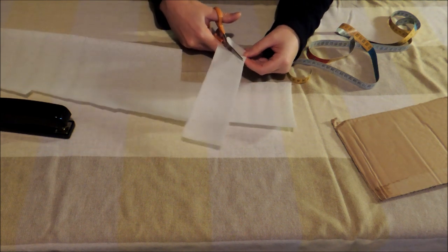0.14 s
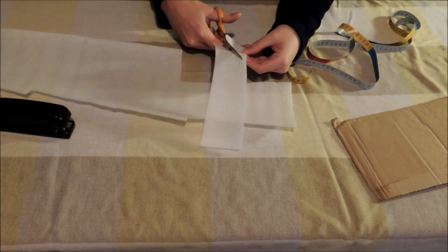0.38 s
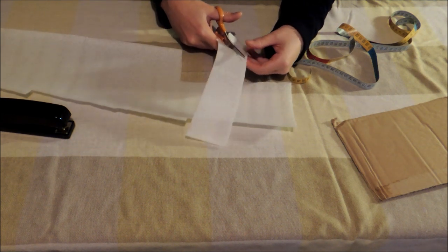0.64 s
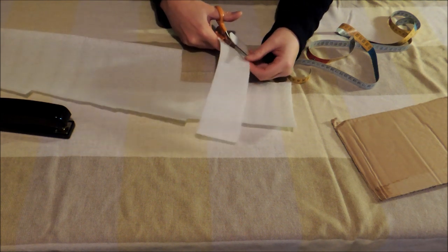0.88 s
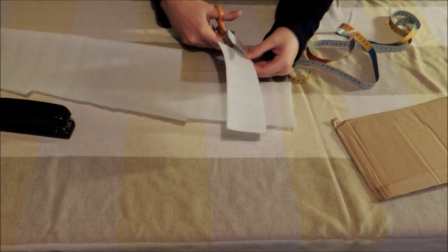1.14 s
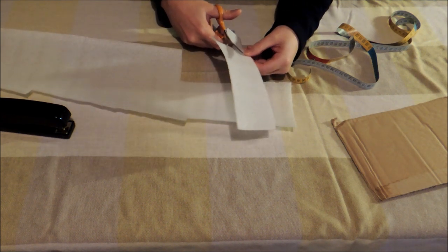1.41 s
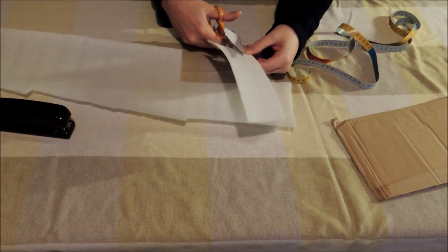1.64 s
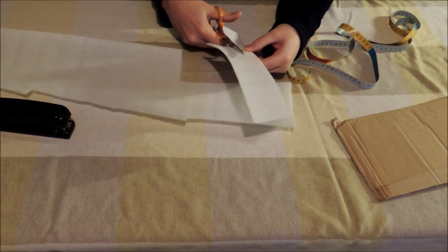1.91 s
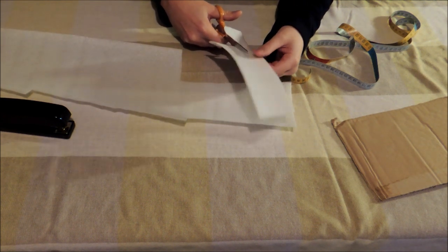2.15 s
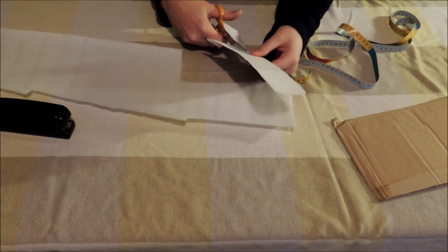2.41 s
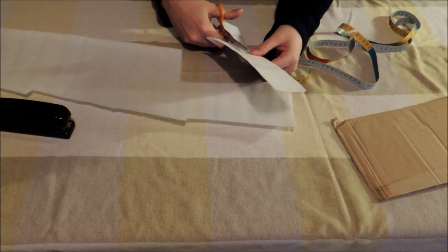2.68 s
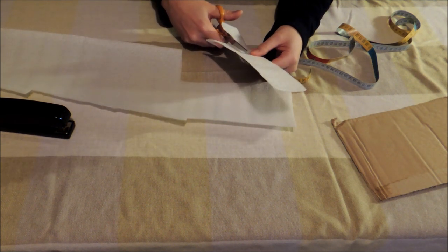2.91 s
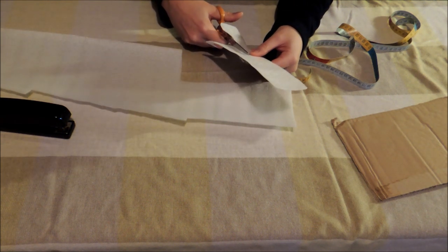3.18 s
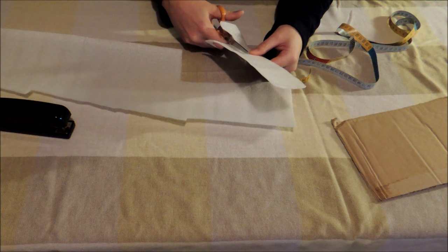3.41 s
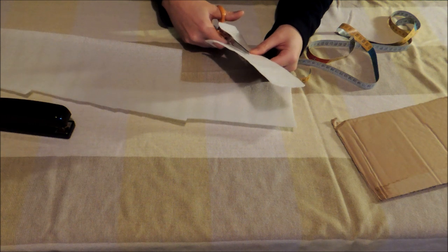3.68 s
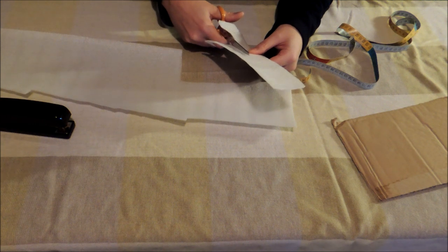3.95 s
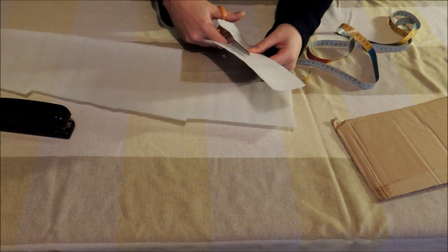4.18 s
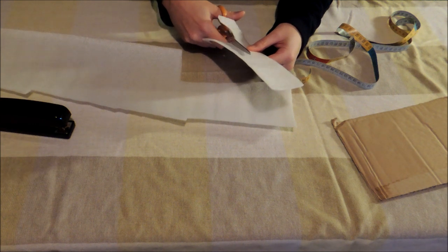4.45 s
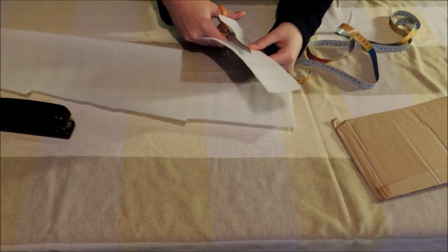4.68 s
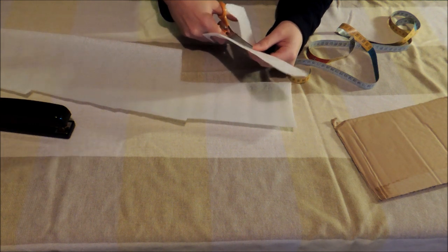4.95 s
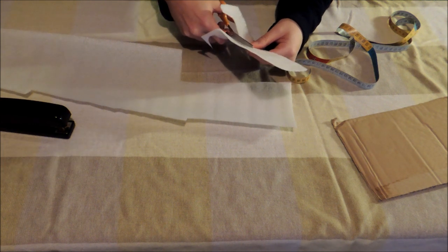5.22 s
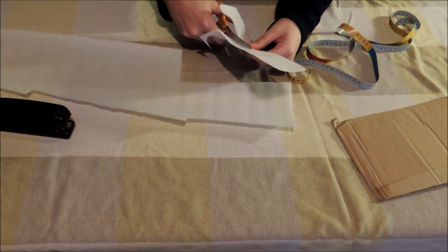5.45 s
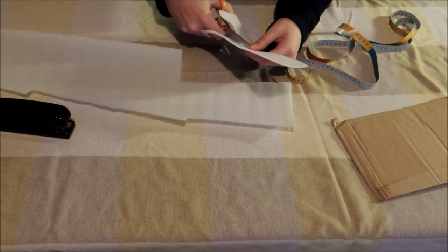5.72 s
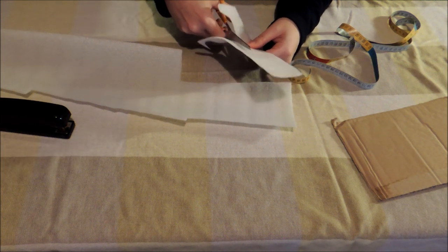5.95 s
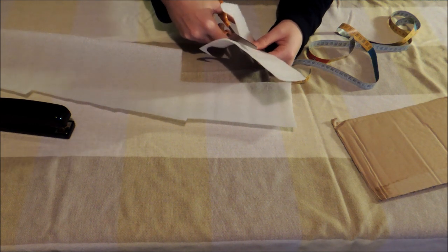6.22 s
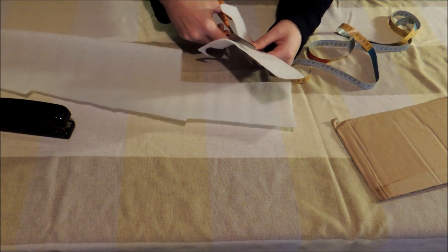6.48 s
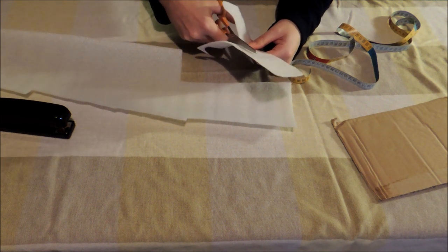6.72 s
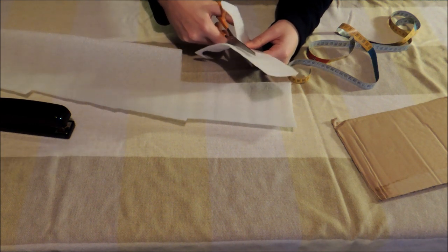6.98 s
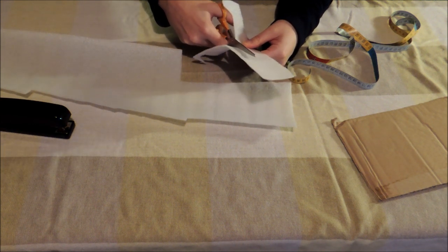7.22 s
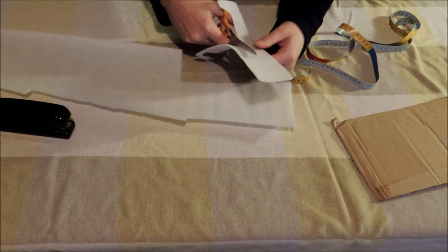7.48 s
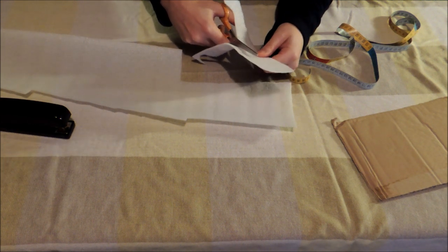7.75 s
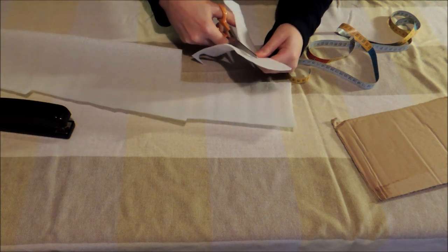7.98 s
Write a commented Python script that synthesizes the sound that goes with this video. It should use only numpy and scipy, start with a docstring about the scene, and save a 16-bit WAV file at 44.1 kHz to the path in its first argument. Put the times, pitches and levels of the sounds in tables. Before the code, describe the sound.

Sparse, sharp little cuts in a foam sheet, dry and fizzy with soft dull knocks, in a quiet room with faint hiss and far traffic.

```python
"""Scissors nibble along a thin foam sheet over a cloth-covered table, close under a camera.
Each stroke is friction noise: dense random slips, weighted by blade pressure, ring the colours of the foam.
Torn cells add sub-millisecond bursts, and the flexing sheet knocks dully; early echoes and a short
diffuse tail answer from table and walls. Behind lie filtered noises: quiet room rumble, slowly
swelling far traffic, a heavy vehicle and the hiss of two microphones."""
import sys
import numpy as np
from scipy import signal
from scipy.fft import rfft, irfft
from scipy.io import wavfile
from scipy.ndimage import uniform_filter1d, minimum_filter1d

SR = 44100
rng = np.random.default_rng(int(sys.argv[2]) if len(sys.argv) > 2 else 0)


def wav_record(signal):
    """Record a signal, one row per channel, as 16-bit PCM in the file named by sys.argv[1]."""
    frames = np.transpose(np.atleast_2d(signal))
    bounded = np.clip(frames, -1, 1)
    # unit amplitude maps onto the largest positive 16-bit level
    quanta = np.round(bounded * 32767).astype(np.int16)
    wavfile.write(sys.argv[1], SR, quanta)


def level_to_linear(level):
    """Convert decibel levels to linear amplitude factors, elementwise."""
    exponent = np.asarray(level, float) / 20
    return 10 ** exponent


N = 358091

# spectra of tearing foam, from the finest cells to the coarsest: (frequency [Hz], relative level [dB])
FIZZ = [(7000, -40.5), (10500, -6), (12300, -0.5), (14000, -4), (15000, -26.5), (16500, -20.5)]
CRISP = [(5000, -24.5), (7500, -2), (9300, -1), (11000, -2), (14000, -15)]
CRUNCH = [(2000, -15.5), (3000, -8.5), (3600, -7.5), (4900, -4), (7000, -1.5), (10000, -19)]
# the blades bite, pressure coming quickly and letting go slowly:
# (time of full pressure [s], fizz level [dB], crunch over fizz [dB], length [s])
BITES = [(0.075, -61, -2, .041), (0.445, -67, -5.5, .069), (0.766, -65, 11, 0.02), (1.252, -63, -1, .037),
         (1.347, -52.5, -2, .043), (1.707, -55.5, 1, 0.031), (1.768, -59, -1, .029), (1.998, -60, -4, .056),
         (2.04, -59, -1, 0.038), (2.605, -49.5, -2.5, 0.046), (3.044, -63, -10, .057),
         (3.334, -59, -3, 0.044), (3.538, -60.5, -3, 0.057), (3.674, -53, -4, 0.049), (4.015, -56, 1, 0.05),
         (4.341, -54, -3.5, 0.04), (4.653, -49, -2, 0.048), (4.905, -58, -5, .027), (4.93, -48, -1.5, .035),
         (5.27, -68, -1, 0.064), (5.539, -55, -3, 0.036), (5.75, -59.5, -3, 0.078), (6.461, -67, -2, 0.034),
         (6.868, -43, -0.5, 0.062), (7.45, -53, -1, 0.038), (7.605, -60, -7, 0.026),
         (8.06, -51, -2.5, .023), (8.089, -43.5, 0.5, .035)]


def evened(x):
    """Normalisation of signal power: scales to rms 1."""
    return x / np.sqrt(np.mean(x ** 2) + 1e-20)


def read(points, hz):
    """Linear interpolation of a spectrum on a logarithmic frequency axis."""
    f, value = np.transpose(points)
    return np.interp(np.log(hz + 1), np.log(f + 1), value)


def wash(spectrum, patchy_db, apart=1.):
    """Spectral shaping of Gaussian noise with drifting patches; coherence between microphones is high in the bass."""
    # likeness of left and right: (frequency [Hz], correlation [-1 to 1])
    likeness = [(60, 0.97), (150, 0.91), (380, 0.66), (950, 0.39), (2380, -0.019), (5980, -0.051),
                (15000, 0.069)]
    frames, hz = N // 512 + 5, np.fft.rfftfreq(2048, 1 / SR)
    a, b, c, d, patches = rng.standard_normal((frames, 1025, 5)).T
    patches = uniform_filter1d(patches, size=20, axis=0)  # across frequency
    patches = evened(uniform_filter1d(patches, size=10, axis=1))  # across time
    same = np.clip(1 - apart * (1 - read(likeness, hz)), -1, 1)[:, None]
    left = a + 1j * b
    right = same * left + np.sqrt(1 - same ** 2) * (c + 1j * d)
    z = np.array([left, right]) * level_to_linear(read(spectrum, hz)[:, None] + patchy_db * patches)
    return evened(signal.istft(z, nperseg=2048, noverlap=1536)[1][:, :N])


def room_tone():
    """Stationary coloured noise: the room's rumble and the microphones' hiss."""
    # (frequency [Hz], relative density [dB per Hz])
    tone = [(12, -36), (20, 0), (48, -5.5), (99, -8), (232, -12.5), (430, -16.5), (700, -19.5),
            (1250, -17.5), (1600, -18.5), (2200, -24.5), (2700, -22.5), (3000, -25), (4100, -27),
            (6660, -27.5), (9300, -29), (13400, -28.5), (16500, -25.5)]
    return level_to_linear(-50.5) * wash(tone, patchy_db=0.8)


def far_traffic():
    """Amplitude-modulated noise: distant traffic swells slowly."""
    # (frequency [Hz], relative density [dB per Hz])
    roar = [(60, -24), (150, -6), (300, -7), (550, -6.5), (750, -5), (1000, -1.5), (1400, -2), (1900, -6),
            (2500, -12.5), (6000, -28)]
    # (time [s], level [dB])
    swell = [(0, -72), (2.2, -69.5), (4.3, -58.5), (5.7, -55.5), (8.2, -55.5)]
    return level_to_linear(np.interp(np.arange(N) / SR, *np.transpose(swell))) * wash(roar, patchy_db=1.5, apart=0.65)


def vehicle_rumble():
    """Amplitude-modulated low-frequency noise: a heavy vehicle's rumble comes and goes."""
    # (frequency [Hz], relative density [dB per Hz])
    low_roar = [(15, -24), (30, 5), (70, -9), (130, -17.5), (400, -40)]
    # (time [s], level [dB])
    swell = [(0, -59), (1, -60), (2, -77), (6, -72), (6.8, -59), (7.4, -55.5), (8.2, -74)]
    return level_to_linear(np.interp(np.arange(N) / SR, *np.transpose(swell))) * wash(low_roar, patchy_db=4.0)


def background():
    """Superposition of the ambient noises, a little stronger on the left."""
    return (room_tone() + far_traffic() + vehicle_rumble()) * level_to_linear([[1.3], [.8]])  # left, right [dB]


def scatter(count, rise, fall, size=18):
    """Spectral whitening: short random bursts keep only fine ripple, on an even broad colour."""
    n = np.arange(512)
    z = rfft(rng.standard_normal((count, 512)) * (n + 1.) ** rise * np.exp(-n / fall))
    z /= np.sqrt(uniform_filter1d(abs(z) ** 2, size=size, axis=1))
    return np.roll(irfft(z), 64, axis=1)  # 64 samples of lead-in


def room(x):
    """Reverberation: smeared early echoes from table, wall and ceiling, then a diffuse, decaying tail."""
    # near surfaces: (delay [s], left level [dB], right level [dB])
    echoes = [(.0017, -13.5, -7.5), (.0035, -13, -25), (.0078, -24, -20), (.0083, -23, -8.5),
              (0.011, -43, -26), (0.0163, -23, -40), (.0204, -38, -23)]
    # (frequency [Hz], reverberation time for 60 dB of decay [s])
    decay_times = [(1000, 0.37), (4000, 0.3), (8000, 0.22), (13000, 0.14)]
    tail_db = -7.5  # diffuse tail
    length, wet = SR // 2, 0
    for turn in range(3):
        hz, t, z = signal.stft(rng.standard_normal((2, length)), SR, nperseg=128)
        z = z * level_to_linear(-60 * t / read(decay_times, hz)[:, None])
        tail = signal.istft(z, SR, nperseg=128)[1][:, :length]
        tail *= np.clip(np.arange(length) / SR / 0.018, .2, 1)  # reflections thicken over the first moments
        tail *= level_to_linear(tail_db) / np.linalg.norm(tail[0])
        smears = scatter(count=len(echoes), rise=0, fall=6.1)  # rough surfaces
        for (delay, left_db, right_db), smear in zip(echoes, smears):
            tail[:, round(delay * SR) - 64:][:, :512] += np.outer(level_to_linear([left_db, right_db]), smear)
        # three random responses take turns at constant total power, so no single tail colours every snap
        share = np.sqrt(2 / 3) * np.cos(np.pi * (np.arange(N) / SR * 3 + turn / 3))
        wet = wet + signal.fftconvolve(x * share, tail, axes=1)[:, :N]
    return x + wet


def leaned(x):
    """Frequency-dependent level difference: the hands sit where the left microphone catches more treble."""
    # (frequency [Hz], left minus right [dB])
    lean = [(1000, 0.5), (5000, -0.5), (9000, 0), (13000, 3.5)]
    lean_db = read(lean, np.fft.rfftfreq(N, 1 / SR))
    return irfft(rfft(x) * level_to_linear(lean_db * np.array([[.5], [-.5]])), N)


def causal(gain):
    """Minimum phase by the folded cepstrum: shortest causal response with the given spectra (last axis)."""
    cepstrum = irfft(np.log(gain + 1e-5 * gain.max(-1, keepdims=True)))
    half = cepstrum.shape[-1] // 2
    cepstrum[..., 1:half] *= 2
    cepstrum[..., half + 1:] = 0
    return irfft(np.exp(rfft(cepstrum)))


def peaked(gain):
    """Peak normalisation: scales spectra so that their minimum-phase clicks peak at 1."""
    return gain / abs(causal(gain)).max(-1, keepdims=True)


def flexing(centre_hz):
    """Damped resonance: the colour of the sheet flexing once."""
    hz = np.fft.rfftfreq(512, 1 / SR)
    return peaked(1 / (1 + ((hz - centre_hz) / 720.0) ** 2) ** 2)


def burst(times, spectra):
    """Impulsive excitation of a filter: brief jolts of each spectrum, partly unlike in the two microphones."""
    unlike = 0.33  # gain of the part that has opposite sign in the two microphones
    both, apart = scatter(count=2 * len(times), rise=.5, fall=11., size=32).reshape(-1, 2, 512).transpose(1, 0, 2)
    jolts = both + unlike * np.array([apart, -apart])
    jolts = jolts * level_to_linear(3.5)  # spread over time, so lifted to keep the peak
    sounds = signal.fftconvolve(causal(spectra)[None], jolts, axes=2)
    loudest = uniform_filter1d(sounds.sum(0) ** 2, size=14, axis=1).argmax(1)
    starts = np.round(times * SR).astype(int) - loudest
    out = np.zeros((2, N + 1024))
    for k, start in enumerate(starts):
        out[:, start:start + sounds.shape[2]] += sounds[:, k]
    return out[:, :N]


def knocks():
    """Impulse response of a bending plate: the sheet bucks with a dull knock."""
    # (time [s], level [dB], centre frequency [Hz])
    bucks = [(0.7574, -44.5, 2200), (1.699, -40, 1760), (1.7625, -37, 1900), (2.0055, -41, 1720),
             (4.6537, -47, 1110), (4.9294, -40.5, 1500), (4.9359, -41, 1110), (7.183, -42, 2620),
             (7.199, -42, 2720), (7.446, -37, 2870), (7.6312, -33, 1050), (8.0803, -38.5, 1050)]
    s, db, hz = np.transpose(bucks)[:, :, None]
    return burst(s[:, 0], level_to_linear(db) * flexing(hz))


def all_strokes():
    """Asymmetric pressure pulses: bites and slides as rows of time, level, crunch, rise and fall."""
    # blades or a finger slide along the foam, pressure building, then dropping:
    # (time of full pressure [s], fizz level [dB], crunch over fizz [dB], length [s])
    slides = [(0.263, -67, -4, .041), (0.834, -51.5, -12, .047), (1.037, -58, 0, .046),
              (1.892, -61.5, -1, .052), (2.161, -48.5, -7, 0.032), (2.29, -54.5, -11, 0.072),
              (2.354, -60, -7, .023), (2.435, -55.5, -3.5, 0.076), (2.786, -60.5, -3, .051),
              (3.226, -61.5, -6, 0.054), (3.872, -59.5, -1.5, .052), (4.201, -53.5, -3.5, 0.053),
              (4.535, -52.5, -3, 0.054), (5.381, -60, -3.5, 0.12), (5.905, -57, -3, .085),
              (6.078, -41, -7, 0.048), (6.353, -65, -1, .058), (6.69, -57, -0.5, .07),
              (7.054, -50, -1.5, 0.077), (7.196, -48, 2.5, 0.054), (7.363, -49.5, -1.5, 0.067),
              (7.632, -51.5, -0.5, 0.095), (7.813, -62.5, 1, .031), (7.912, -57.5, -4, 0.13)]
    bite_rise, slide_rise = 0.33, .57  # share of the length spent rising
    rows = [(s, db, crunch_db, share * length, (1 - share) * length)
            for table, share in ((BITES, bite_rise), (slides, slide_rise))
            for s, db, crunch_db, length in table]
    return np.array(rows)


def small_tears(count):
    """Random fracture: a few tears scatter around the middle of every bite, coloured like it."""
    tear_db, spread_db = 11.5, 3.5  # mean over the bite's fizz level, standard deviation
    s, db, crunch_db, rise, fall = all_strokes()[:len(BITES)].T[:, :, None]
    late, size, crisp, crunch = rng.standard_normal((len(s), count, 4)).transpose(2, 0, 1)
    late = np.tanh(late)
    when = np.clip(s + late * np.where(late < 0, rise, fall), .02, N / SR)
    level_db = db + tear_db + spread_db * size - 4.0 * abs(late)
    tear_crisp_db = 4.0 * crisp - 1.5
    tear_crunch_db = crunch_db + 4.0 * crunch - 4.5
    return np.stack([when, level_db, tear_crisp_db, tear_crunch_db], -1).reshape(-1, 4)


def snaps():
    """Brittle fracture: a cell wall tears in under a millisecond, a burst coloured by the cells that give way."""
    # the clearest clicks, tears at the blade and a few of their early echoes:
    # (time [s], fizz level [dB], crisp over fizz [dB], crunch over fizz [dB])
    clear_clicks = [(0.4357, -44, -5, -5), (0.7574, -32, -3, 10), (1.244, -30, -1, -7),
                    (1.3351, -32.5, 11.5, 10), (1.3368, -32, -9, -13.5), (1.6699, -50, 0, -3),
                    (1.6885, -38, -4, -1), (1.702, -41, -1, 0), (1.7077, -39, -4, 1),
                    (1.7621, -30, -1.5, -4), (1.7661, -39, -1, 3), (1.9898, -23, -4, -4.5),
                    (1.9973, -41, 0, 1), (2.0053, -36, 2.5, 1), (2.03, -36.5, 3.5, -9),
                    (2.0474, -34, -9, -21.5), (2.0615, -37, -3, -3), (2.582, -38, 0, -2),
                    (2.5937, -21.5, -0.5, -4), (3.3232, -39, -8, -1), (3.3324, -39, -8, -12),
                    (3.664, -36, 5, 4), (3.6704, -23.5, -2, -8), (3.6752, -34.5, 5, 3),
                    (3.9984, -28, 5, -5.5), (4.0125, -27, 0.5, -5.5), (4.0164, -36, 1, -11),
                    (4.0455, -41, -1, -13), (4.3312, -31.5, 0, -3), (4.3436, -37.5, 4, -2),
                    (4.3625, -36, -6, -7), (4.5963, -26, -0.5, -5), (4.625, -32, -4, -4),
                    (4.6443, -32, -5, -5), (4.6472, -30, 1, -5), (4.6537, -23.5, 1, -1),
                    (4.7935, -47, -6, -9), (4.8461, -49, -6, -6), (4.8939, -39, 5, -9),
                    (4.8989, -39, -1, -12), (4.9149, -45, -1, -11), (4.9288, -40, 2, -3),
                    (4.9353, -30.5, -1, -6), (5.1044, -44, -4, -11), (5.25, -44.5, -7, 4),
                    (5.278, -42, 2, 4), (5.2973, -47, 2, 2), (5.3748, -46, -6, -8), (5.4826, -47, 3, 1),
                    (5.514, -33, -9, -16), (5.5295, -19, -1.5, -11.5), (5.5445, -29, -5, -4),
                    (5.6321, -47, -4, -6), (5.71, -44, -7, -18), (5.7314, -44, -7, -10),
                    (6.1781, -36.5, -5, -19), (6.4602, -45, 5, -7), (6.8345, -35, -2, 4),
                    (6.8392, -37, -2, -5), (6.8457, -19.5, -7, -11), (6.8483, -25, -12, -7),
                    (6.8553, -29, -5, -7), (6.8642, -25.5, 2, -0.5), (6.8716, -17.5, 0, -12),
                    (6.88, -26, 2, 1), (6.893, -26, -4, -6), (6.9, -30, 4.5, 1), (6.9074, -27, 6, 5.5),
                    (6.916, -46, -3, 6), (7.1009, -49, -7, -8), (7.1476, -41, -3, -7), (7.162, -27, 0, -4),
                    (7.1714, -29, 4, -6), (7.182, -33, 4, 2), (7.196, -28.5, 3, 2.5), (7.198, -25, 0, 2.5),
                    (7.1999, -31, -1, 1), (7.4032, -36, 3.5, -3), (7.4368, -38, -4, -1),
                    (7.441, -27.5, -1, 1), (7.446, -27, -8.5, -9.5), (7.4512, -30, -9, -6),
                    (7.459, -27, -3, -8), (7.47, -29.5, -6, -1), (7.4826, -33, -8, 0),
                    (7.4966, -40, -1, -8), (7.604, -23.5, 1.5, -0.5), (7.6123, -42, -2, 0),
                    (7.6315, -18, -2, -10), (8.0527, -42, 8, -2), (8.0582, -29, -4, -14),
                    (8.0803, -9.5, -0.5, -8.5), (8.0885, -31, -2, 2), (8.0995, -35, 0, -6)]
    s, db, crisp_db, crunch_db = np.vstack([clear_clicks, small_tears(count=3)]).T[:, :, None]
    thud_db = -51.5 + 0.27 * (db + 32.5)  # every tear flexes the sheet a little
    hz = np.fft.rfftfreq(512, 1 / SR)
    shapes = [peaked(level_to_linear(read(c, hz))) for c in (FIZZ, CRISP, CRUNCH)] + [flexing(1700)]
    levels = (db, db + crisp_db, db + crunch_db, thud_db)
    power = sum((level_to_linear(d) * g) ** 2 for g, d in zip(shapes, levels))
    return burst(s[:, 0], np.sqrt(power))


def strokes():
    """Stick-slip friction: dense tiny slips follow the pressure of each stroke; hard strokes also crackle."""
    bite_edge, slide_edge = 1.17, 1.47  # power of the pressure curve: slides have rounder tops
    t, hz, pressure = np.arange(N) / SR, np.fft.rfftfreq(512, 1 / SR), np.zeros((3, N))
    for s, db, crunch_db, rise, fall in all_strokes():
        crisp_db = -0.8 + 0.6 * crunch_db  # coarser strokes are also crisper
        near = slice(max(round((s - 6 * rise) * SR), 0), round((s + 6 * fall) * SR))
        late = t[near] - s
        edge = bite_edge if rise < fall else slide_edge
        stroke_db = db - 8.55 * abs(late / np.where(late < 0, rise, fall)) ** edge
        pressure[:, near] += level_to_linear(stroke_db + np.array([[0], [crisp_db], [crunch_db]]))
    slip_db = 4.2 * np.minimum(rng.exponential(1, N), 6)  # a few slips stand out
    slips = rng.standard_normal((3, N)) * level_to_linear(slip_db)
    crackle = rng.standard_normal((3, N)) * (rng.random(N) < 350 / SR)  # about 350 a second
    hard = np.clip(pressure[0] / level_to_linear(-46), 0, 1)
    slips = evened(slips) + 0.25 * hard * evened(crackle)
    cells = causal(level_to_linear([read(c, hz) for c in (FIZZ, CRISP, CRUNCH)]))
    cells /= np.linalg.norm(cells, axis=1, keepdims=True)
    return (pressure * signal.oaconvolve(slips, cells, axes=1)[:, :N]).sum(0)


def scene():
    """Linear superposition: cutting in the room over the background."""
    return room(leaned(snaps() + knocks() + strokes())) + background()


def top_cut(x):
    """Nothing passes above the cut-off."""
    return signal.sosfilt(signal.butter(12, 16480, fs=SR, output="sos"), x)


def record(dry):
    """Transient-gated band limiting: the highest treble passes only around sudden clicks."""
    edge_hz, rolloff_hz, top_hz = 14330, 14700, 16350
    low = signal.oaconvolve(dry, signal.firwin(1023, edge_hz, window=("kaiser", 10), fs=SR)[None], "same")
    # a click is sudden when its treble power stands 10 dB over the mean of the preceding 34 ms
    treble = np.diff(dry.mean(0), 2, prepend=[0, 0]) ** 2
    usual = uniform_filter1d(treble, size=1500, origin=749)
    sudden = uniform_filter1d(treble, size=32) > 10 * usual
    widened = 1 - minimum_filter1d(1. - sudden, size=240)
    gate = uniform_filter1d(widened, size=128)
    rolloff = signal.butter(8, rolloff_hz, fs=SR, output="sos")
    top = signal.sosfilt(rolloff, dry - low)
    top = signal.oaconvolve(top, signal.firwin(255, top_hz, fs=SR)[None], "same")
    return top_cut(low + gate * top)


dry = scene()
out = record(dry)
wav_record(out)
```